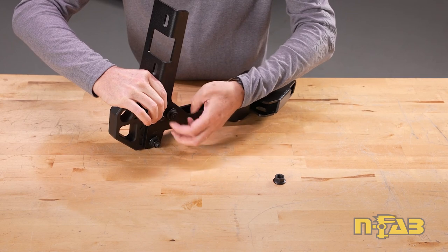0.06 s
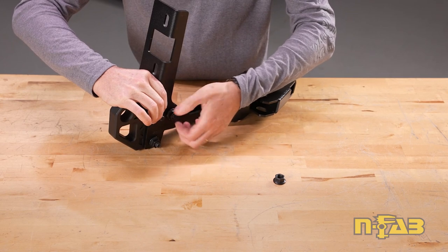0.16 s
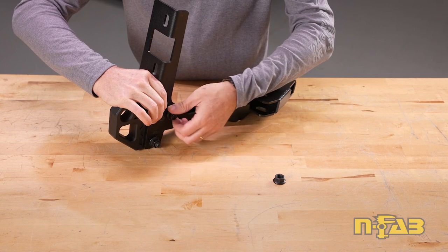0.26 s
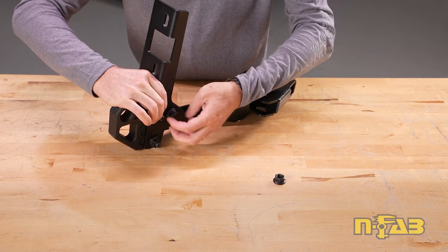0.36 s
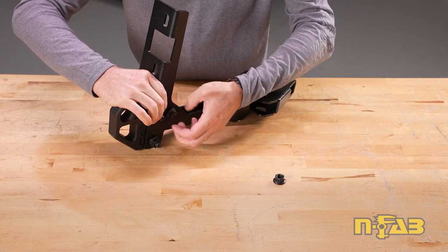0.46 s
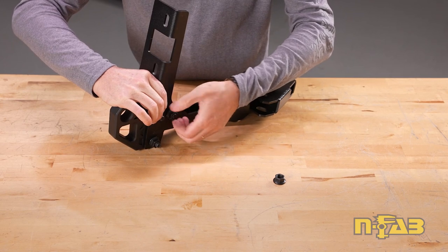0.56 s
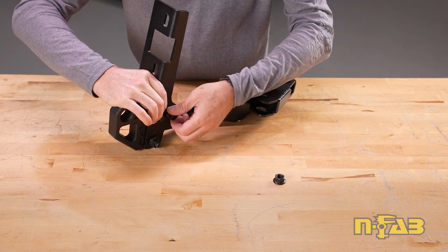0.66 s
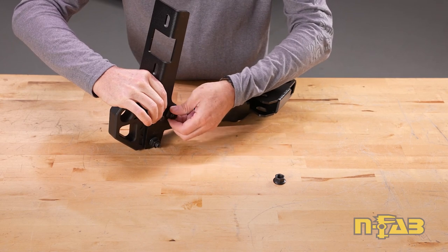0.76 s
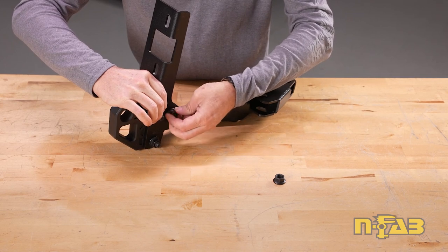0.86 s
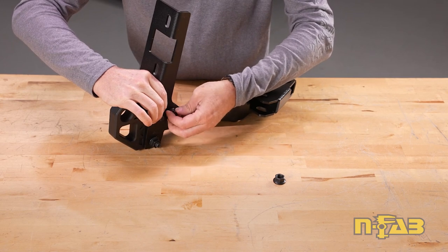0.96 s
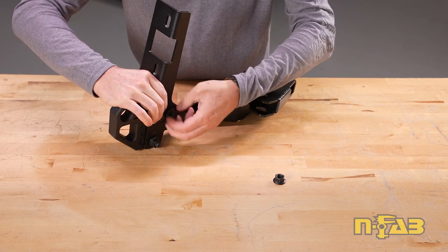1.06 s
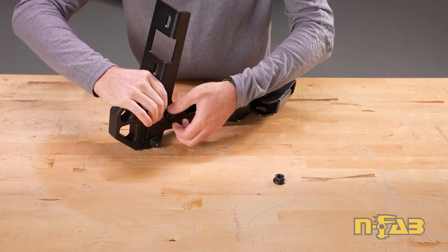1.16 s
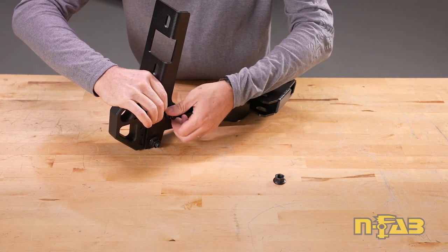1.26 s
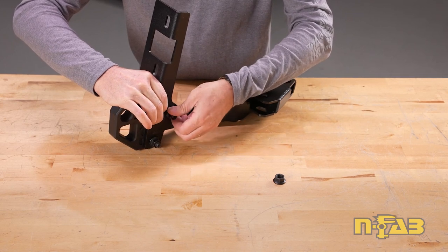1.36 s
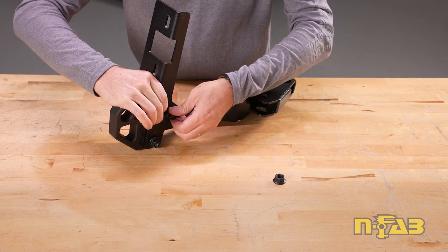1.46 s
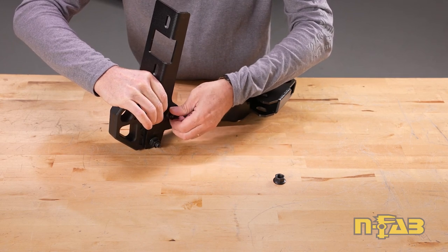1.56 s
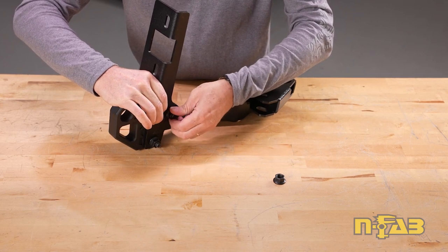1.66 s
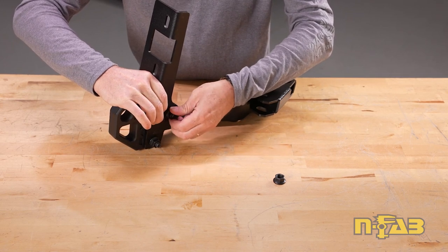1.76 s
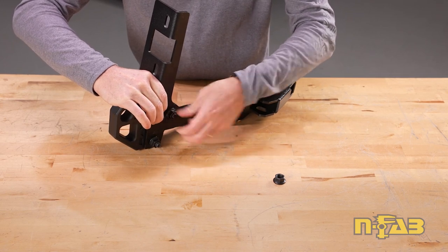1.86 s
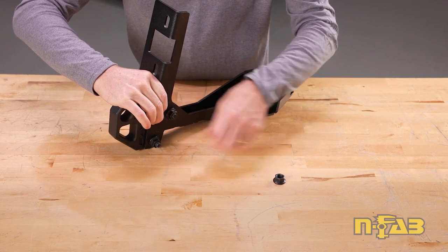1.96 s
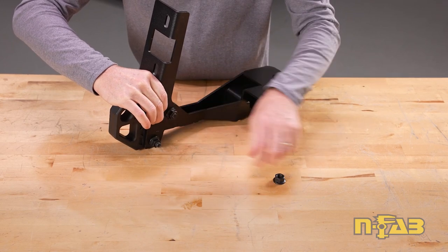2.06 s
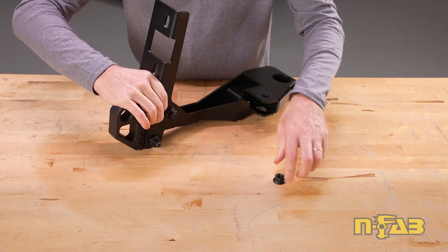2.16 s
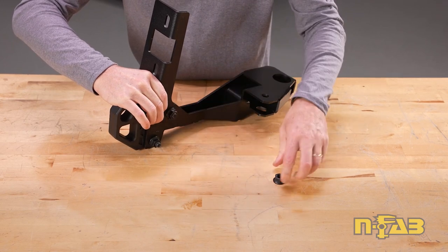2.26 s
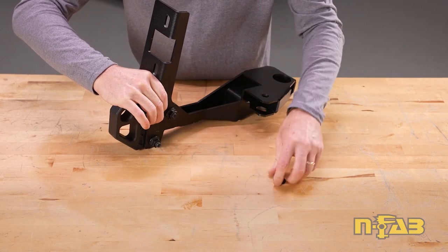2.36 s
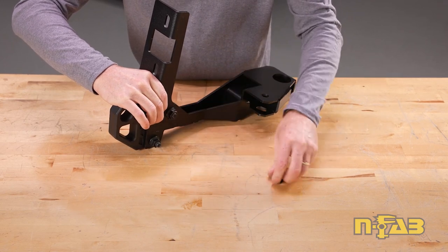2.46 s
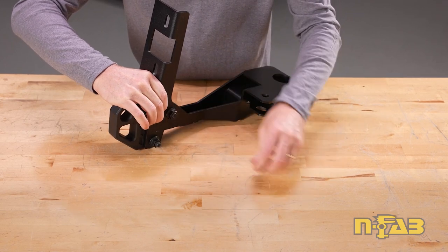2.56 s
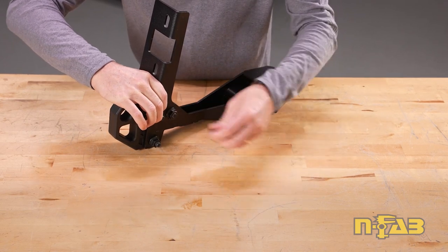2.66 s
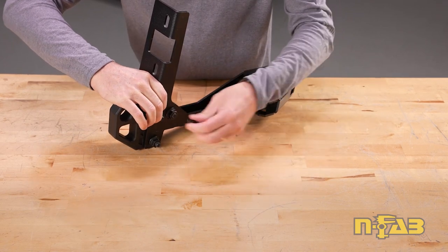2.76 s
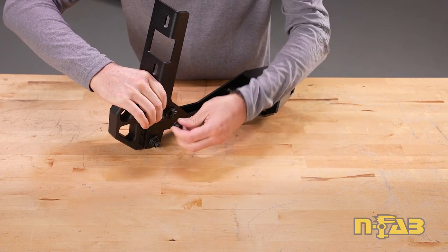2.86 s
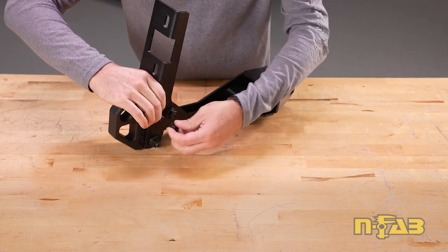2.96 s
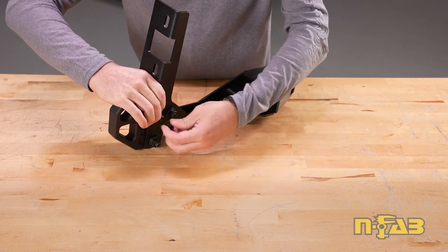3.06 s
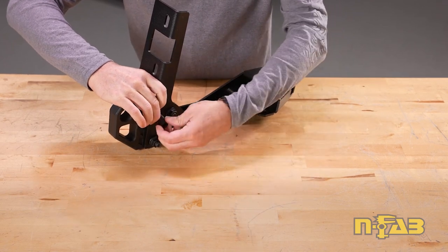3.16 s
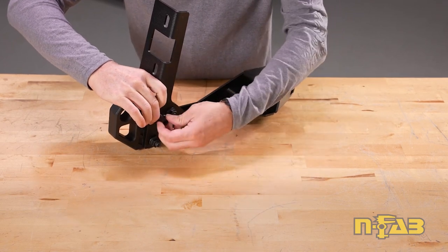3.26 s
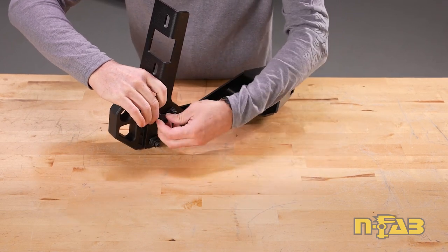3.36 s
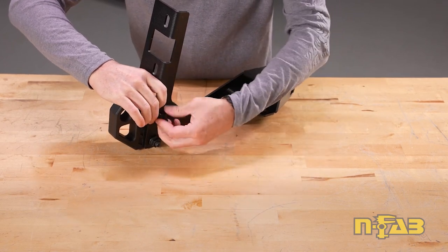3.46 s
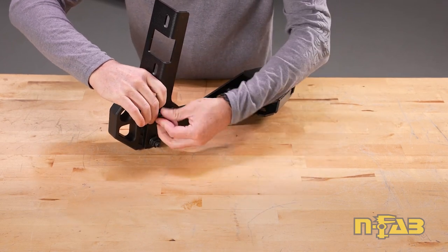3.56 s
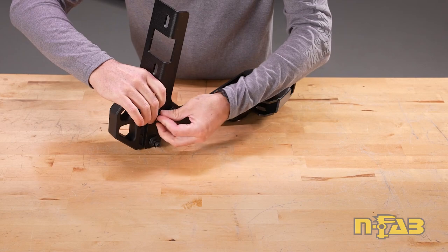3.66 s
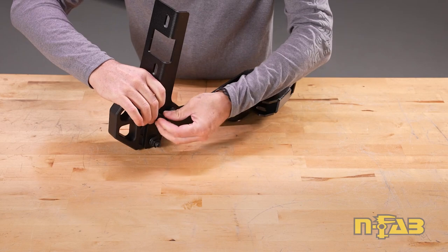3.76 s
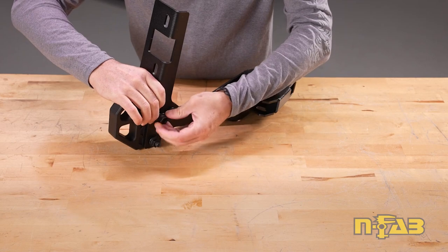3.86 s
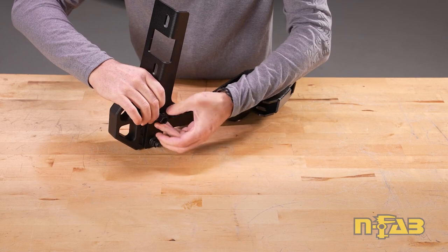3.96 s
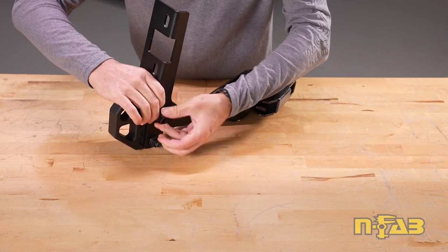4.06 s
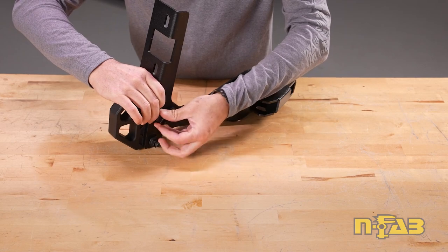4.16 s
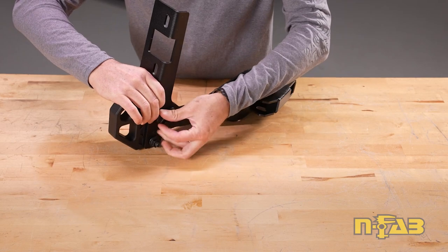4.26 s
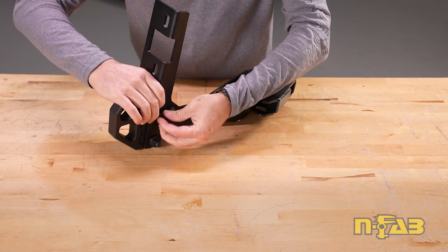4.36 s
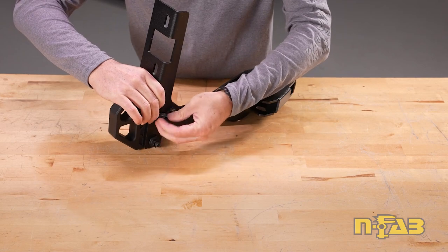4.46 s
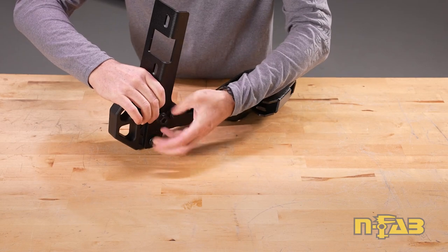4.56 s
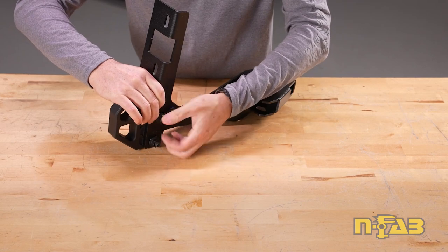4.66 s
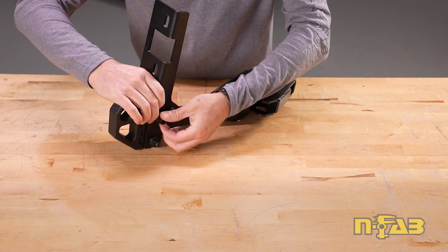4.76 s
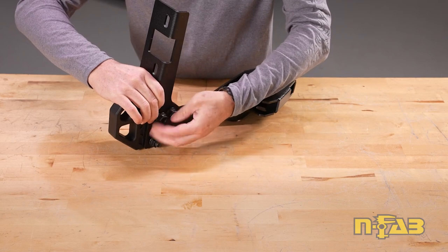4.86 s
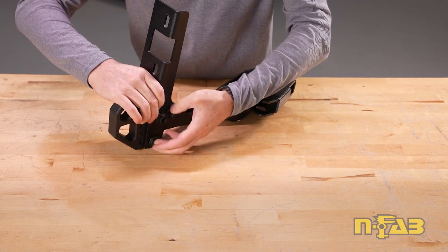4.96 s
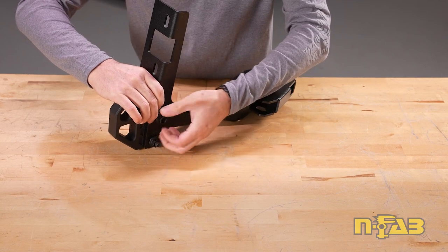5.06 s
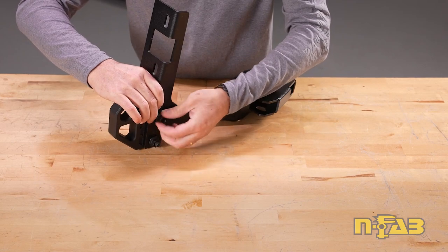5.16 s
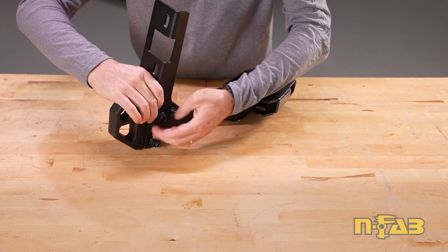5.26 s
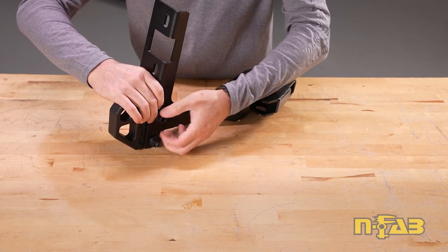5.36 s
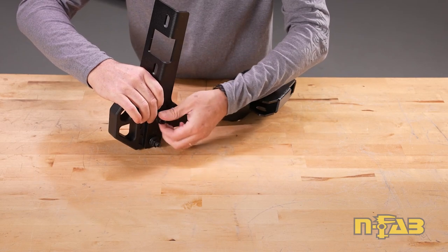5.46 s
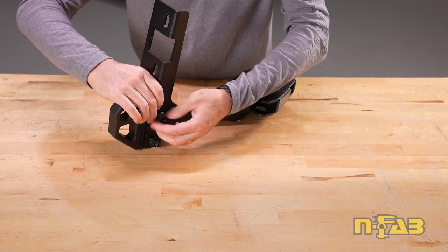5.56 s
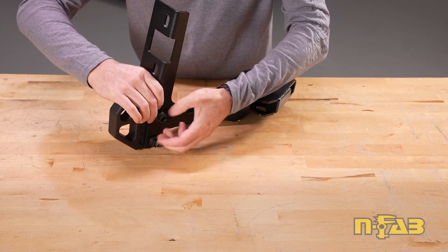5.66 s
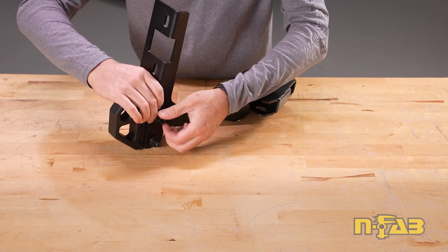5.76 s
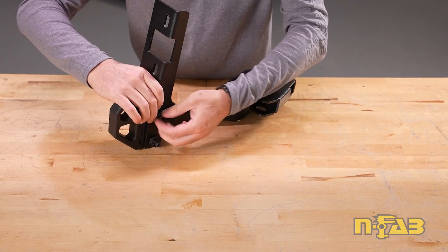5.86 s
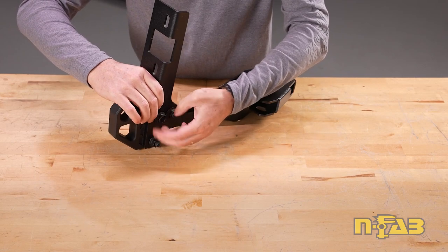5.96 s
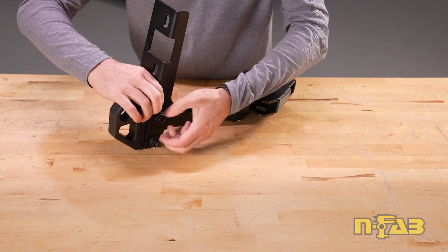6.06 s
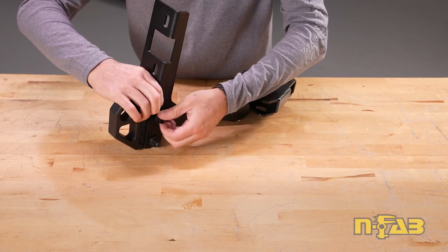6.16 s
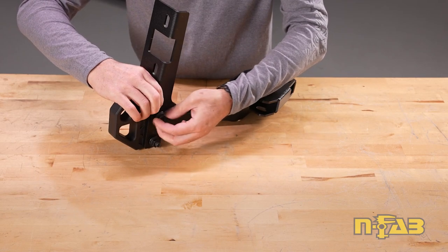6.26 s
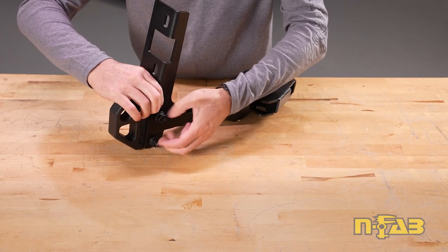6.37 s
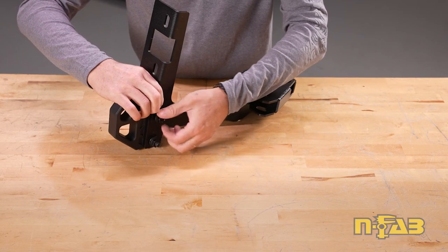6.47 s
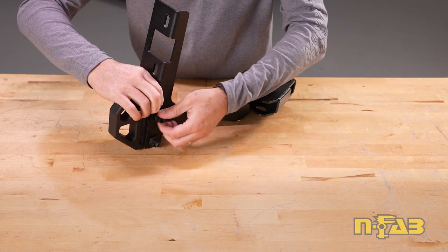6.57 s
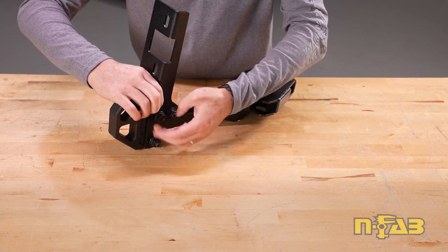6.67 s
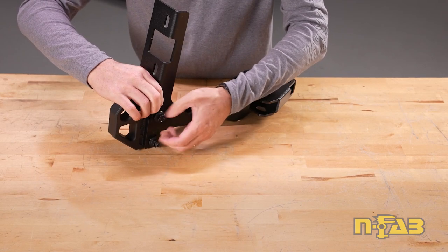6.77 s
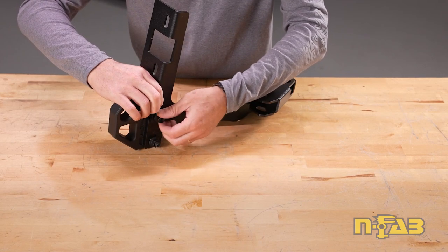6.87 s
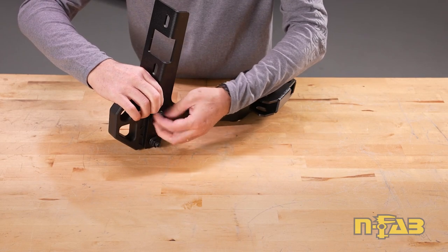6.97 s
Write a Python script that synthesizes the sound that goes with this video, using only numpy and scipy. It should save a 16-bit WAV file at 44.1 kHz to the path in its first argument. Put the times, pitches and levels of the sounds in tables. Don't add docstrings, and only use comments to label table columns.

```python
import sys
import numpy as np
from scipy import signal
from scipy.fft import rfft, irfft, next_fast_len
from scipy.io import wavfile
from scipy.ndimage import map_coordinates

SR = 44100
rng = np.random.default_rng(int(sys.argv[2]) if len(sys.argv) > 2 else 0)


def transcribe(signal):
    frames = np.atleast_2d(signal).T
    limited = np.clip(frames, -1, 1)
    pcm = np.round(limited * 32767).astype(np.int16)
    wavfile.write(sys.argv[1], SR, pcm)


def field_ratio(decibels):
    return 10 ** (np.asarray(decibels, dtype=float) / 20)


N = 309141
TIME = np.arange(N) / SR


def unit(x):
    return x / np.sqrt(np.mean(x ** 2) + 1e-20)


def along(points, hz):
    f, v = np.transpose(points)
    return np.interp(np.log(hz + 1), np.log(f + 1), v)


def coloured(x, spectrum):
    m = next_fast_len(x.shape[-1] + 8192)
    gain = field_ratio(along(spectrum, np.fft.rfftfreq(m, 1 / SR)))
    return irfft(rfft(x, m) * gain, m)[..., :x.shape[-1]]


def within(x, low_hz, high_hz):
    band = signal.butter(2, [low_hz, high_hz], "bandpass", fs=SR, output="sos")
    return signal.sosfilt(band, x)


def wobble(rate):
    steps = np.arange(0, N + 64, 64)
    knots = rng.standard_normal(int(N * rate / SR) + 4)
    return np.interp(np.arange(N), steps, map_coordinates(knots, [steps * rate / SR]))


def grit(per_second, spread_db, smooth):
    hits = rng.random(N) < per_second / SR * field_ratio(3 * wobble(40))
    sizes = hits * field_ratio(spread_db * np.minimum(rng.exponential(size=N), 3))
    bursts = signal.lfilter([1], [1, -np.exp(-1 / (0.0015 * SR))], sizes)
    return unit((unit(bursts) + smooth) * rng.standard_normal(N))


def tones(table, rise):
    out, t = np.zeros(N + SR), np.arange(SR // 2) / SR
    for s, hz, db, t60 in table:
        tone = field_ratio(db - 60 * t / t60) * np.sin(2 * np.pi * hz * t)
        out[round(s * SR):][:len(t)] += tone * (1 - np.exp(-t / rise))
    return out[:N]


# f/Hz, level/dB [per Hz]
AIR = [(12, -69), (20, -19), (43, -2), (65, 5.5), (86, -9.5), (120, -2.5), (147, -17), (243, -15),
       (630, -25.5), (725, -32.5), (789, -21.5), (933, -29.5), (12300, -40.5), (16300, -56.5)]
# f/Hz, level/dB [rms]
HUM = [(59.2, -79), (118.4, -71.5), (236.9, -79.5), (479.1, -84.5), (721.4, -89), (958.2, -96.5)]


def workshop():
    hum = np.zeros(N)
    for hz, db in HUM + [(180, -76)]:
        level = field_ratio(db + 4.5 + 1.1 * wobble(11))
        hum += level * np.sin(2 * np.pi * hz * TIME + 0.28 * wobble(6.6))
    air = unit(coloured(rng.standard_normal(N), AIR))
    return hum + field_ratio(-60.5 + 0.58 * wobble(1)) * air


# f/Hz, time to fall 60 dB t/s
ECHO = [(150, 0.36), (1500, 0.23), (9000, 0.15)]


def walls(x):
    hz, t, z = signal.stft(rng.standard_normal(SR // 2), SR, nperseg=256)
    fading = z * field_ratio(-60 * t / along(ECHO, hz)[:, None])
    tail = signal.istft(fading, SR, nperseg=256)[1]
    later = np.pad(x, (300, 0))
    return signal.fftconvolve(later, tail / np.linalg.norm(tail))[:N]


# t/s, level/dB [peak]
PUSHES = [(0.248, -57), (0.559, -51.5), (0.861, -50), (1.587, -63), (2.715, -42), (3.116, -38.5),
          (4.427, -41), (4.706, -46), (5.517, -37), (5.75, -39.5), (6.249, -46.5)]


def pushes():
    out, t = np.zeros(N + SR), np.arange(SR // 4) / SR
    swing = np.sin(2 * np.pi * 55 * t) * field_ratio(-60 * t / 0.07)
    swing += 0.67 * np.sin(2 * np.pi * 105 * t) * field_ratio(-60 * t / 0.036)
    for s, db in PUSHES:
        out[round(s * SR):][:len(t)] += field_ratio(db + 6) * swing
    return out[:N]


BRUSH_S = [2.374, 2.377, 5.98, 1.79, 4.045, 3.53, 3.87, 4.429, 5.524, 2.668, 1.31]
# half length t/ms, centre f/Hz, level/dB
BRUSHES = [(9.37, 630, -46), (9.353, 1440, -48), (24, 11500, -64), (20, 8200, -72), (12.035, 870, -59.5),
           (91, 1740, -59.5), (35, 1400, -69), (3, 13500, -46), (2.5, 13500, -52), (8, 900, -58),
           (14, 700, -60)]


def brushes():
    out, t = np.zeros(N), np.arange(-SR // 4, SR // 4)
    skin = grit(per_second=280, spread_db=1.5, smooth=2.8)
    for s, (half_ms, hz, db) in zip(BRUSH_S, BRUSHES):
        near = round(s * SR) + t
        swell = np.exp(-(1000 * t / SR / half_ms) ** 2)
        out[near] += field_ratio(db) * swell * unit(within(skin[near], hz / 1.43, hz * 1.23))
    return out


# t/s, f/Hz, level/dB [peak], time to fall 60 dB t/s
KNOCKS = [(.8, 190, -29.5, 0.12), (.865, 185, -35, 0.35), (1.587, 185, -30.5, 0.21),
          (1.587, 323, -36, 0.21743), (2.72, 324, -28.5, 0.29), (2.72, 185, -28.5, 0.2),
          (.69, 350, -47, 0.23), (2.72, 473, -30.5, 0.17), (4.03, 190, -47, 0.19), (4.8, 456, -48, .17),
          (4.03, 340, -48.5, .15), (1.425, 470, -45.5, 0.19), (1.532, 470, -46, .15),
          (5.548, 456, -35, .13), (2.678, 470, -46, .12), (4.708, 456, -34, .15), (6.825, 456, -44, .12),
          (3.13, 460, -44, .2), (5.875, 456, -36, .1), (.75, 300, -46, .2), (4.395, 456, -42, .15),
          (5.19, 456, -36, .15), (6.48, 456, -46, .15), (6.89, 456, -41, .12), (4.845, 340, -42, .15),
          (1.305, 456, -45, .15), (1.6, 190, -45.5, 0.72), (2.73, 190, -44, 0.72), (.86, 324, -39.5, 0.28),
          (4.19, 324, -41, .15), (4.18, 190, -42, .2), (4.205, 456, -41.5, .17), (0.83, 456, -48, .2),
          (.683, 456, -35.5, 0.19), (.805, 456, -38, 0.24), (.86, 456, -36.5, .2), (4.43, 455, -35, 0.21),
          (5.52, 450, -36.5, .17)]


def knocks():
    return tones(KNOCKS, rise=0.0012)


# t/s, f/Hz, level/dB [peak], time to fall 60 dB t/s
SINGING = [(1.305, 2213, -32, 0.08), (1.305, 1970, -26.5, 0.036), (2.717, 4204, -52, 0.4),
           (2.718, 1893, -49, 0.51), (2.718, 1110, -21.5, 0.055), (2.678, 1180, -36, .1),
           (5.753, 1180, -33, .1), (.823, 1180, -34, .07), (2.72, 5410, -50, .2), (1.305, 1180, -32, 0.1),
           (4.429, 1180, -35, 0.12), (4.429, 1893, -42, .2), (5.522, 1180, -28, 0.12),
           (5.753, 1100, -33, 0.15), (4.428, 4204, -59.5, .3), (5.17, 3900, -49, .3),
           (3.5, 1650, -55, 0.18), (4.85, 2799, -62, 0.66), (5.885, 2800, -49.5, 0.8208),
           (6.6, 7099, -64, .1), (.56, 1180, -40, .08), (.599, 1150, -38, .07), (.64, 1180, -44, .07),
           (.86, 2800, -58, .4), (3.12, 1893, -48, .2), (3.325, 1893, -52, .2), (6.3, 1893, -48, .15),
           (5.91, 1180, -44, .2), (1.532, 2213, -52, .12), (4.174, 2800, -62, .25)]


def singing():
    return tones(SINGING, rise=0.002)


RING = SR // 3


def ringing(modes):
    hz, t60, db = np.transpose(modes)[:, :, None]
    t = np.arange(RING) / SR
    return field_ratio(db - 60 * t / t60) * np.sin(2 * np.pi * hz * t)


# t/s, level/dB [peak], sharpness level/dB, nut rattle level/dB, contact length t/ms
FIRST_TAPS = [(0.231, -32, 2, -17, 2.9), (0.261, -33, 0, -17, 4.5), (0.558, -36, 4.5, 1, 8.5),
              (0.599, -38, 0, -26, 7), (0.637, -32, -1.5, -25, 4.2), (0.671, -30.5, -0.5, -18, 4.623),
              (0.711, -33, -18, -27.5, 1.7), (0.775, -36.5, -3, -12, 9), (0.8, -31.5, 3, -9, 3),
              (0.822, -27, 3.5, -7, 7), (0.854, -29.5, -1, -3, 6.6), (1.265, -47, -1, -14.5, 6.8),
              (1.304, -24.5, -40, -36, 1.2), (1.42, -43.5, -7.5, -7, 2.7), (1.447, -48.5, -5, -4.5, 3.9),
              (1.532, -42.5, -2, -3, 3.7), (1.761, -62.5, 4, 6, 14)]
STARTING_TAPS = [(2.677, -28, -40, -34, 3), (2.717, -15, 1.5, -16.5, 2.6), (3.117, -25, -4, 8, 3.5),
                 (3.209, -40.5, 2.5, -18.5, 2.3), (3.248, -38, 3, 9, 1.6), (3.323, -30, -7, -18, 2.5),
                 (3.42, -43, -13, -30, 4.5), (3.664, -39, -6.5, -8.5, 3.8), (4.029, -56.5, -23, -31, 3.959),
                 (4.174, -31, -12.5, -15, 1.6), (4.197, -37, -40, -28, 3.3)]
SPINNING_TAPS = [(4.413, -42, 3.5, 8, 1.694), (4.427, -20, -3, 7, 2.3), (4.697, -39, -6.5, 3.5, 2.1),
                 (4.705, -22.5, -2.5, -3.5, 2.2), (5.064, -43, -8.5, -21, 2.2),
                 (5.079, -33.5, -1.5, -0.5, 5.126), (5.504, -36, 8, 3, 6), (5.523, -20, -4.5, 12, 1.9),
                 (5.752, -23, -2.5, 2, 3.3), (5.821, -38.5, 2, -5, 5), (5.848, -38.5, 13, 1.5, 11),
                 (5.879, -25.5, -5.5, -2.5, 1.3), (6.103, -32, 0, -10, 4.7), (6.199, -36.5, 15, 11.5, 6.9),
                 (6.246, -32, -15, -4.5, 6.06), (6.472, -33.5, 3.5, -2.5, 2), (6.822, -36, 10, -1, 3.8)]
TAPS = np.array(FIRST_TAPS + STARTING_TAPS + SPINNING_TAPS)


def struck(modes, levels_db, scatter_db):
    out, t = np.zeros(N + SR), np.arange(2048) / SR
    strengths = field_ratio(scatter_db * rng.standard_normal((len(TAPS), len(modes))))
    bursts = rng.standard_normal((len(TAPS), len(t))) * np.exp(-1000 * t / TAPS[:, 4:])
    rings = signal.fftconvolve(strengths @ ringing(modes), bursts, axes=1)
    rings *= 1 - np.exp(-np.arange(rings.shape[1]) / 20)
    for s, db, ring in zip(TAPS[:, 0], levels_db, rings):
        out[round(s * SR):][:len(ring)] += field_ratio(db) * ring / np.abs(ring).max()
    return out[:N]


# t/s, lift level/dB, time to fall 20 dB t/s
CATCHES = [(0.268, 4, .02), (0.690, 5, .02), (0.743, 3, .03), (4.228, 5, .02), (4.275, 5, .03),
           (4.326, 6, .02), (4.357, 5, .015), (4.375, 6, .02), (4.385, 6, .015), (4.766, 1, .03),
           (4.81, 4, .02), (4.83, 6, .025), (5.118, 3, .02), (5.127, 3, .02), (5.142, 6, .015),
           (5.157, 7, .025), (5.172, 5, .02), (5.195, 5, .02), (5.207, 5, .02), (5.226, 5, .03),
           (5.449, 6, .03), (5.459, 5, .03), (5.478, 4, .02), (5.538, 5, .015), (5.828, 6, .02),
           (5.851, 6, .03), (5.864, 8, .03), (5.906, 5, .03), (6.121, 9, .015), (6.157, 6, .04),
           (6.18, 3, .02), (6.211, 8, .02), (6.248, 6, .015), (6.293, 6, .03), (6.525, 5, .03),
           (6.548, 4, .02), (6.567, 4, .03), (6.6, 3, .02), (6.642, 4, .02), (6.883, 4, .02),
           (6.905, 7, .02), (6.925, 3, .03), (6.95, 3, .02), (3.45, 6, .03), (3.495, 5, .03)]


def catches():
    gain, t = np.ones(N + SR), np.arange(SR // 8) / SR
    for s, db, fall_s in CATCHES:
        gain[round(s * SR):][:len(t)] += (field_ratio(db) - 1) * field_ratio(-20 * t / fall_s)
    return gain[:N]


# peak t/s, build-up t/s, level/dB [peak], time to fall 20 dB t/s, sharpness level/dB
FIRST_RUBS = [(0.004, 0.03, -37, 0.0748, -1), (0.05, 0.032, -40.5, 0.0451, 4),
              (0.279, 0.037, -37.5, 0.0231, 1.5), (0.692, 0.02, -38, 0.035, -0.5),
              (0.864, 0.048, -40, 0.0276, -4.5), (0.92, .02, -68, 0.14, 1.5), (1.199, 0.019, -61, 0.04, -8),
              (1.26, .022, -65, 0.06, -10), (1.446, 0.015, -62.5, 0.08, -5), (2.625, 0.031, -57, 0.15, -17),
              (2.745, .012, -60, 0.16, -2), (2.84, .06, -68, 0.35, 6), (.315, .02, -50, .04, 2),
              (.73, .02, -52, .04, -2)]
SECOND_RUBS = [(3.185, .03, -51.5, 0.07, -3.5), (3.215, .008, -49.5, 0.06, -2.5),
               (3.253, 0.0064, -49, 0.07, -6), (3.452, 0.012, -59.5, 0.3, -9),
               (3.666, 0.012, -48, 0.05, -16), (3.63, .05, -56, .05, -6), (3.725, .05, -55, 0.045, -3),
               (4.04, .012, -65.5, .11, -22), (4.21, .035, -52, .07, -20), (4.385, 0.125, -40, 0.014, -6),
               (4.47, .012, -70.5, 0.34, -1.5), (4.845, 0.11, -35.5, 0.012, -4.5),
               (5.148, .05, -34.5, .03, -14), (5.168, .012, -31, .06, -1), (5.205, .02, -36, .045, -3),
               (5.232, .015, -39, .025, -8), (5.478, .05, -35.5, 0.01, -5.5),
               (5.522, 0.03, -27, 0.012, 1.5), (5.872, 0.065, -40, 0.045, 6), (5.905, .015, -45, .04, -8),
               (6.123, 0.006, -45, 0.03, 3), (6.172, .02, -40, .05, 0), (6.212, .02, -38, .025, 1),
               (6.255, .012, -39, .06, -2), (6.295, .008, -46, .022, 3), (6.53, .02, -44, .05, 1),
               (6.575, 0.045, -39.5, 0.1, 0), (6.62, .035, -40, .09, -2), (6.69, .05, -44, .06, -3),
               (6.84, .012, -47, .025, -3), (6.92, .055, -37.5, 0.15, -2), (6.995, 0.04, -39, .06, -3.5)]
# level/dB [over a -42 dB rub], share of its swing, share of its sharpness,
# fall time factor, lag t/s, after-shiver level/dB
FOLLOW = [
    (1.4, 0.96, 0.099, 0.95, 0.0013, -34.5),
    (-3, 0.66, -0.076, 1.24, .008, -23.5),
    (-0.7, 1.025, 1, 0.77, 0.0009, -32),
    (-8.5, 1.05, 0.66, 0.7, 0.001, -37.5),
]
# t/s, half length t/s, level/dB
CHATTER = [(3.715, .085, -69), (4.352, 0.047, -60), (6.61, .028, -46), (5.19, .014, -44),
           (5.068, .006, -56), (4.835, .012, -44), (5.47, .012, -50), (.725, .025, -57), (.69, .012, -48),
           (.59, .025, -56), (1.39, .04, -66)]
SECOND_NUT_S = 3.1


def strokes():
    peak_s, build_s, peak_db, fall_s, sharp_db = np.transpose(FIRST_RUBS + SECOND_RUBS)[:, :, None]
    t, forces = np.arange(0, N + 32, 32) / SR, []
    for over_db, swing, sharp, slower, lag_s, shiver_db in FOLLOW:
        after = t - peak_s - lag_s
        early, late = np.clip(-after, 0, None), np.clip(after, 0, None)
        rub_db = peak_db + 42 - 15.5 * (early / build_s) ** 1.16
        onset_db = -2500 * np.clip(-after - lag_s - build_s, 0, None)
        level_db = -42 + over_db + swing * rub_db + sharp * sharp_db + onset_db
        fall = field_ratio(-20 * (late / (slower * fall_s)) ** 1.17)
        fall += field_ratio(shiver_db - 20 * late / 0.25)
        force = np.linalg.norm(field_ratio(level_db) * fall, axis=0)
        forces.append(np.interp(TIME, t, force))
    low, bench, high, nut = forces
    t = np.arange(SR // 2) / SR
    jolts = np.bincount(np.round(TAPS[:, 0] * SR).astype(int), field_ratio(TAPS[:, 1] + TAPS[:, 3]), N)
    nut = nut + np.abs(signal.fftconvolve(jolts, field_ratio(-45 - 20 * t / 0.16))[:N])
    for s, half_s, db in CHATTER:
        nut += field_ratio(db) * np.exp(-((TIME - s) / half_s) ** 2)
    nut *= field_ratio(-6.5 * (TIME < SECOND_NUT_S))
    return low, bench, high, nut


def rubbed(modes, force, scatter_db):
    grip = np.pi / 4 * (1 + np.tanh(wobble(5)))
    damped = ringing(modes) * field_ratio(-60 * np.arange(RING) / SR / 0.57)
    held = field_ratio(scatter_db * rng.standard_normal((2, len(modes)))) @ damped
    held /= np.linalg.norm(held, axis=1, keepdims=True)
    return signal.fftconvolve(force * [np.cos(grip), np.sin(grip)], held, axes=1)[:, :N].sum(0)


# f/Hz, level/dB
CLICK = [(59, -47), (100, -18.5), (267, -51), (464, 18), (726, -60), (1160, -5.5), (1600, 20), (3910, 5.5),
         (7910, -41.5), (9180, -13), (16300, -88)]


def bare_contact(high_db, high, slips):
    clicks, t = np.zeros(N + SR), np.arange(2048) / SR
    fade = field_ratio(-11 - 60 * t / 0.058) * (1 - np.exp(-t / 0.00048))
    for s, db in zip(TAPS[:, 0], high_db):
        clicks[round(s * SR):][:len(t)] += field_ratio(db) * fade * rng.standard_normal(len(t))
    bare = clicks[:N] + field_ratio(-6) * high * slips
    return coloured(bare, CLICK) / np.std(coloured(slips, CLICK))


# t/s, shift level/dB
HOLD = [(0, 7), (0.45, 5), (0.62, 2), (0.8, 3), (0.95, -3), (1.6, 0), (2.6, -4), (3.0, -4), (3.6, -4),
        (3.66, 2), (4.4, -6), (4.8, -5), (5.2, 1), (5.48, 7), (5.51, -2), (5.6, -7), (6.5, 1), (7.0, -2)]


def holding_hand(x):
    hold_db = np.interp(TIME, *np.transpose(HOLD))
    freed = (field_ratio(hold_db) - 1) * within(x, 1750, 2350)
    damped = (field_ratio(-0.1 * hold_db) - 1) * within(x, 950, 1350)
    return x + freed + damped


LOW_HZ = [641, 818, 1050, 1110, 1140, 1180, 1290, 1600, 1830, 1893, 2110, 2211, 2330]
# time to fall 60 dB t/s, level/dB
LOW = [(0.18, -9.5), (0.12, -13), (0.084, -10.5), (0.075, -4), (.06, -7.5), (0.076, 4.5), (0.021, 4.5),
       (0.073, -10), (0.11, -7), (0.12, -5), (0.086, -7), (0.09, -2.5), (0.013, -36.5)]
# f/Hz, time to fall 60 dB t/s, level/dB
BENCH = [(185.5, 0.18, 6.5), (230.19, 0.19, -9), (324, 0.5, -3.5), (358.6, 0.23, 0), (410, 0.24, -11.5),
         (455.58, 0.3, 7.5), (440.3, 0.2, 0)]
HIGH_HZ = [2572, 2799, 3132, 3316, 3476, 3790, 4072, 4204, 4360, 4670, 5025, 5160, 5410, 5560, 6165, 6310,
           7171, 7757]
# time to fall 60 dB t/s, level/dB
HIGH = [(0.059, -0.5), (0.17, -11.5), (0.03, 3), (0.036, 2), (0.027, -1), (0.023, 4.5), (.05, -3.5),
        (0.1, -19), (0.09, -13.5), (.08, -17), (0.037, -14), (.03, -11.5), (0.057, -22), (0.068, -14),
        (0.064, -14), (0.067, -28), (.08, -29), (0.096, -23.5)]
# f/Hz, time to fall 60 dB t/s, level/dB
FIRST_NUT = [(8300, .012, -5), (9000, .012, -2), (9600, .02, -2), (10300, .012, 0), (11000, .01, -4),
             (11800, .015, -2)]
NUT_HZ = [8420, 8860, 8990, 9150, 9247, 9464, 10360, 11900]
# time to fall 60 dB t/s, level/dB
NUT = [(.05, -33), (0.042, -28.5), (.06, -24.5), (0.032, 8), (0.04, 9), (0.036, 2), (.03, -29), (0.09, -30)]


def parts():
    low, bench, high, nut = strokes()
    slips = grit(per_second=250, spread_db=3.5, smooth=0.9)
    slips *= field_ratio(0.8 * wobble(30) - 2.5) * catches()
    tap_s, low_db, sharp_db, rattle_db = TAPS[:, :4].T
    high_db, nut_db = low_db + sharp_db, low_db + rattle_db
    phase_db = np.repeat([-38.5, -43, -46.5], [len(FIRST_TAPS), len(STARTING_TAPS), len(SPINNING_TAPS)])
    bench_db = phase_db + 0.53 * (low_db + 35) - 0.9 * np.clip(np.abs(sharp_db), 0, 20)
    later = TIME > SECOND_NUT_S
    first_db = nut_db - 200 * (tap_s > SECOND_NUT_S)
    second_db = nut_db - 200 * (tap_s <= SECOND_NUT_S)
    bodies = [(np.c_[LOW_HZ, LOW], low_db, low, (750, 3000)),
              (BENCH, bench_db, bench, (160, 500)),
              (np.c_[HIGH_HZ, HIGH], high_db, high, (2000, 8000)),
              (FIRST_NUT, first_db, nut * ~later, (6000, 13000)),
              (np.c_[NUT_HZ, NUT], second_db, nut * later, (8500, 10600))]
    total = knocks() + singing()
    for modes, tap_db, force, band in bodies:
        sound = struck(modes, tap_db, scatter_db=2) + rubbed(modes, force * slips, scatter_db=5)
        total += within(sound, *band)
    return holding_hand(total) + bare_contact(high_db, high, slips)


def scene():
    work = parts() + brushes()
    return (workshop() + pushes() + field_ratio(-16) * walls(work) + work)[None]


def band_limit(x):
    return signal.sosfilt(signal.butter(12, 16470, fs=SR, output="sos"), x)


def record(dry):
    mix = coloured(dry, [(15500, -1), (16000, -6), (16600, -41.5)])
    return band_limit(mix)


dry = scene()
out = record(dry)
transcribe(out)
```